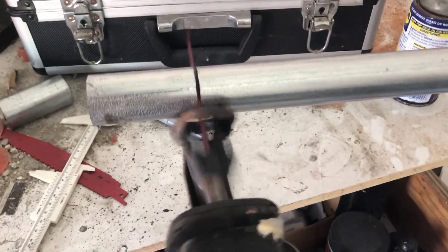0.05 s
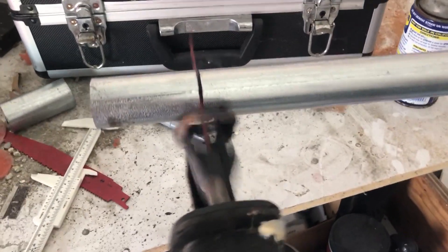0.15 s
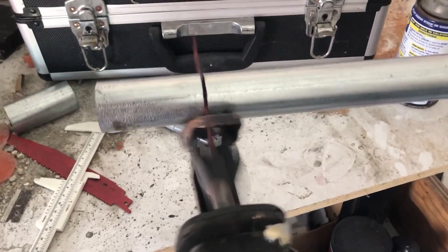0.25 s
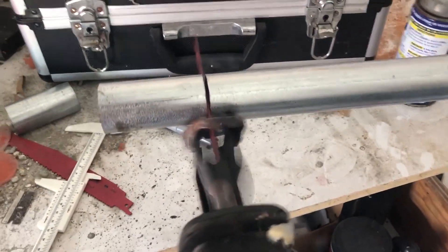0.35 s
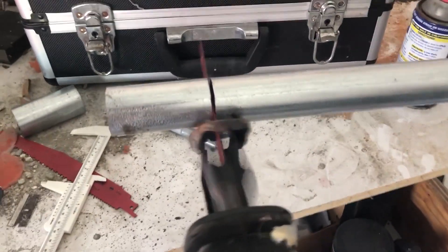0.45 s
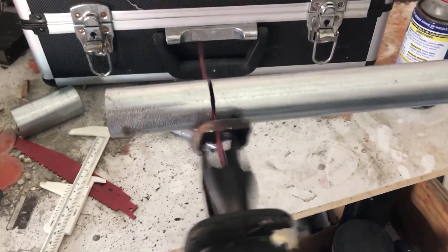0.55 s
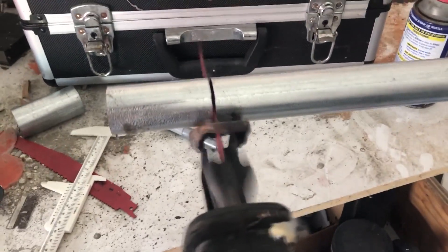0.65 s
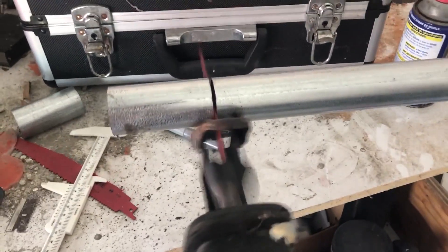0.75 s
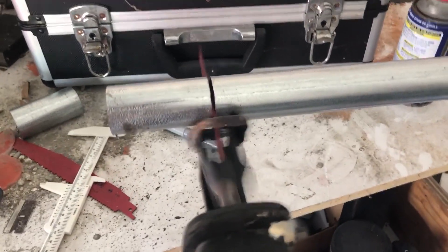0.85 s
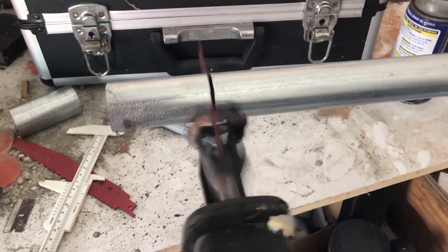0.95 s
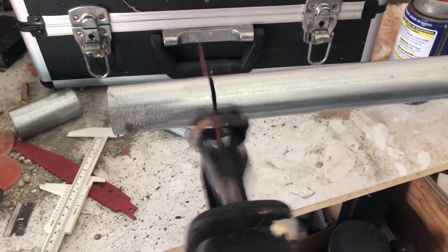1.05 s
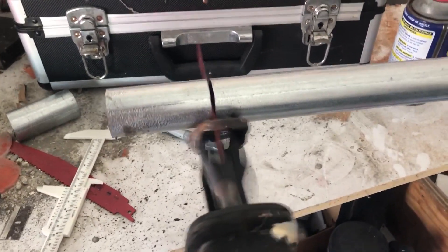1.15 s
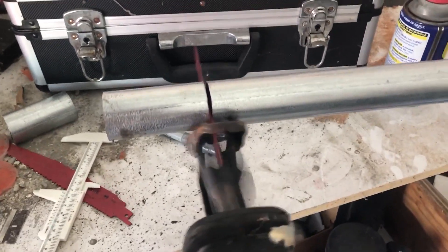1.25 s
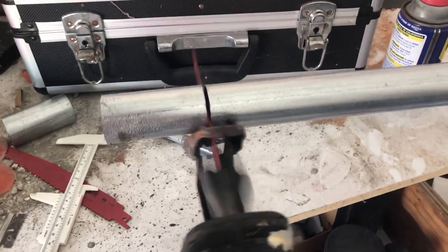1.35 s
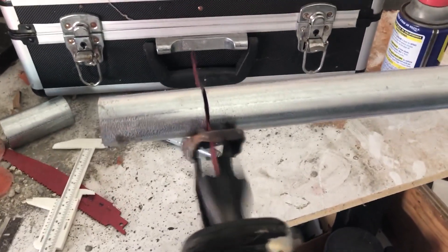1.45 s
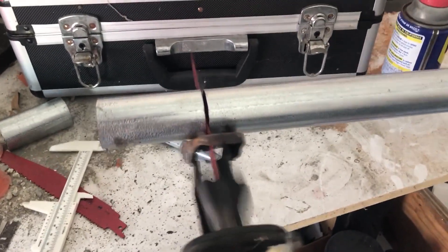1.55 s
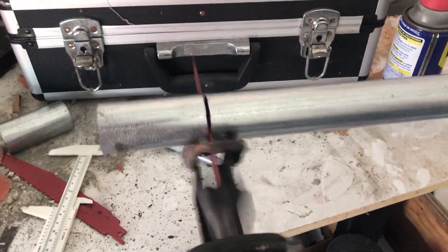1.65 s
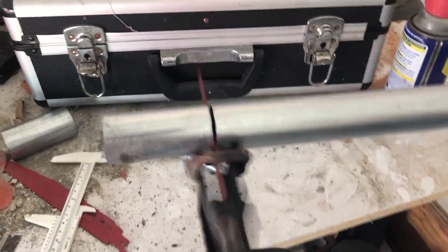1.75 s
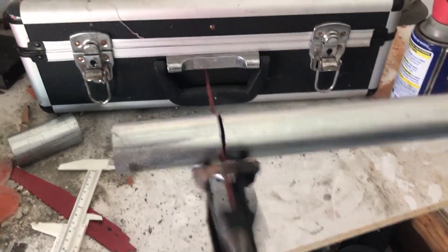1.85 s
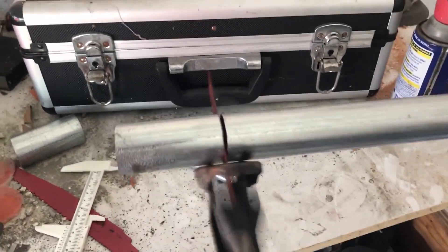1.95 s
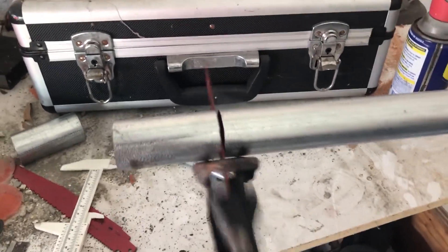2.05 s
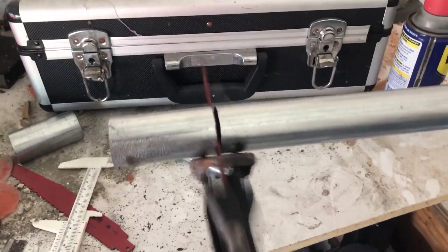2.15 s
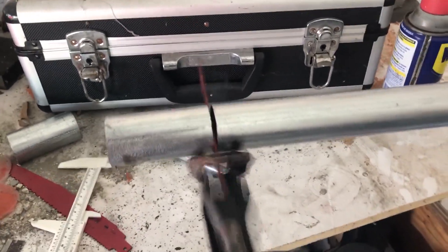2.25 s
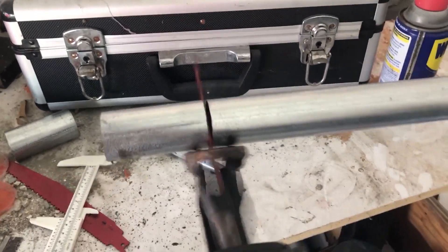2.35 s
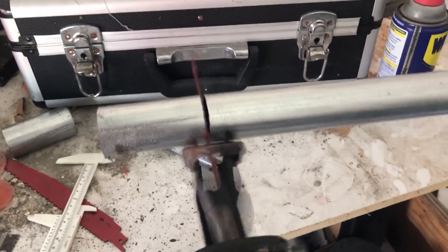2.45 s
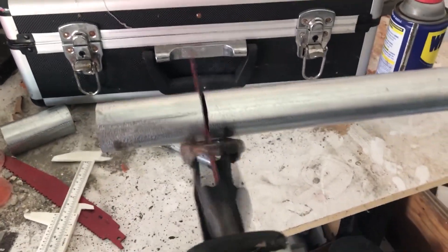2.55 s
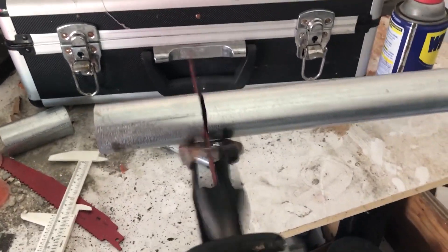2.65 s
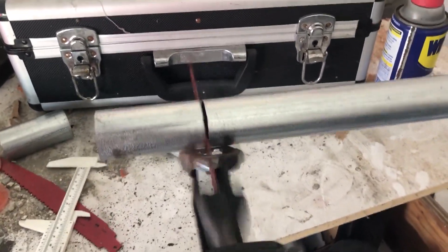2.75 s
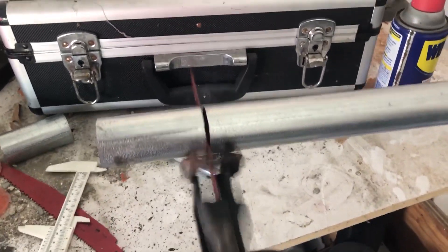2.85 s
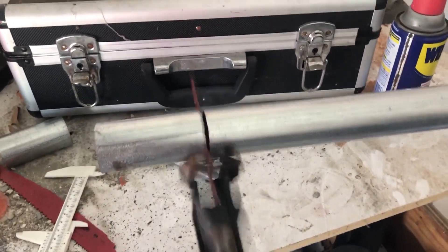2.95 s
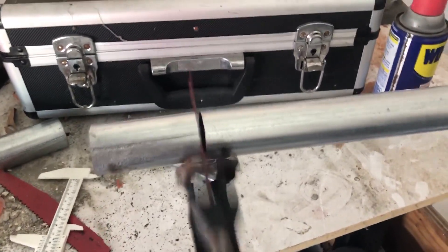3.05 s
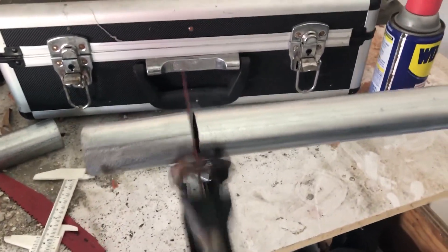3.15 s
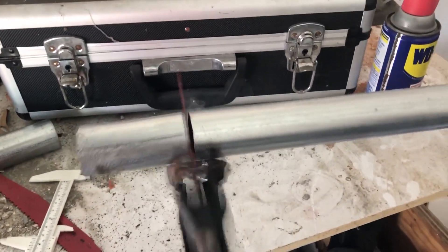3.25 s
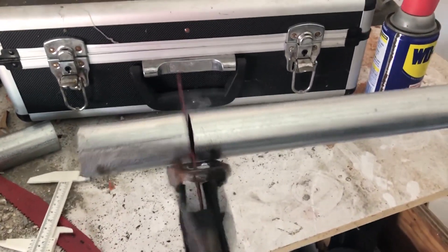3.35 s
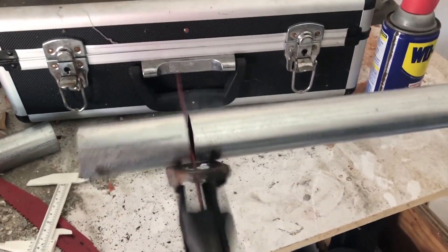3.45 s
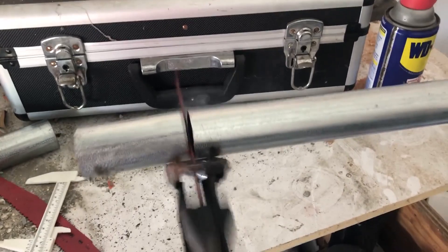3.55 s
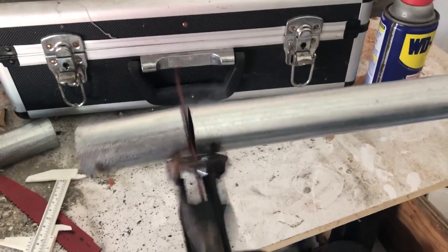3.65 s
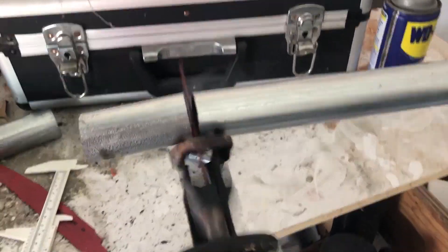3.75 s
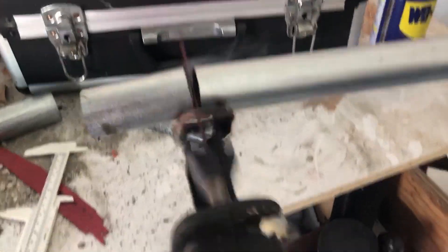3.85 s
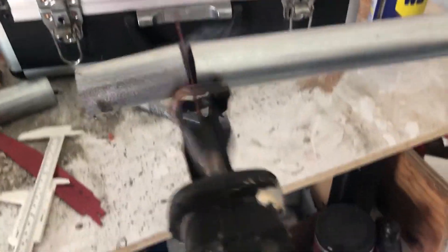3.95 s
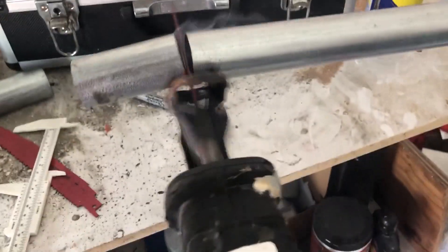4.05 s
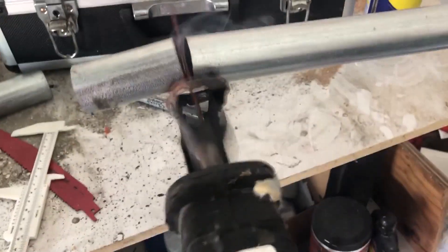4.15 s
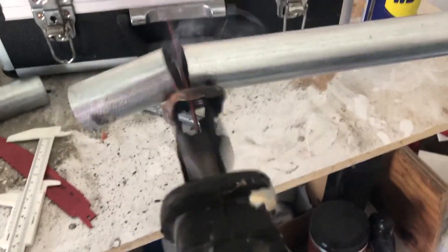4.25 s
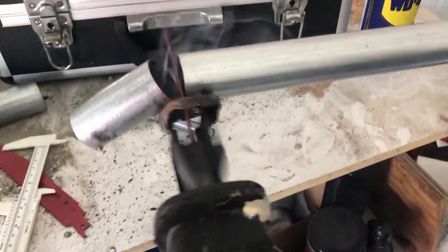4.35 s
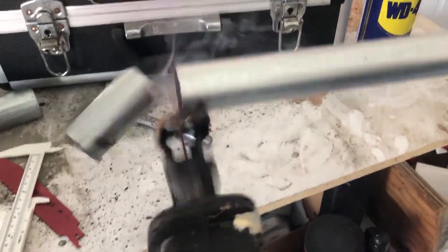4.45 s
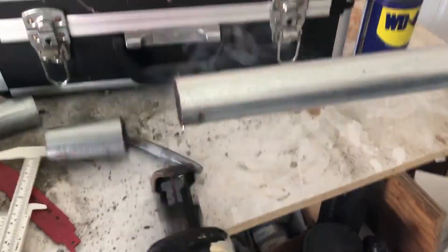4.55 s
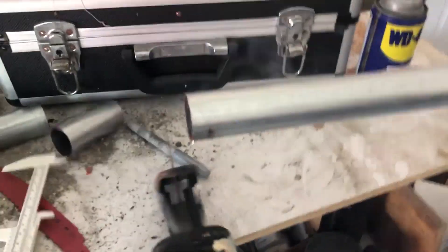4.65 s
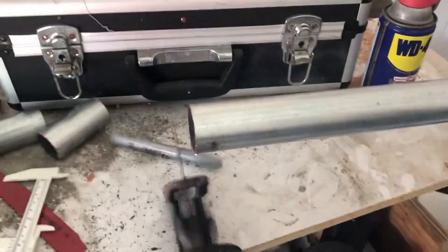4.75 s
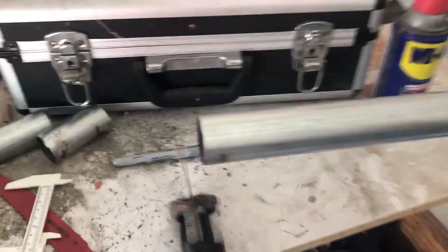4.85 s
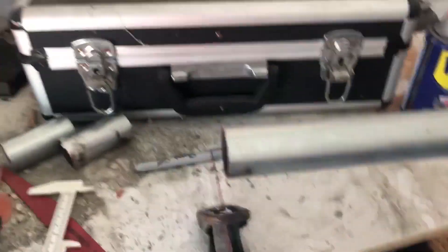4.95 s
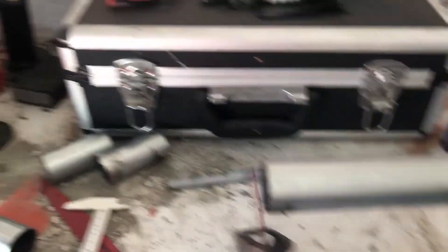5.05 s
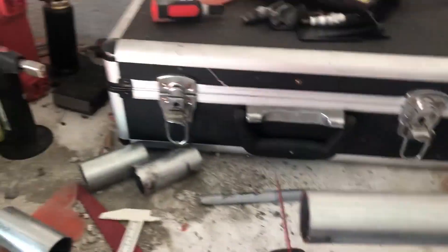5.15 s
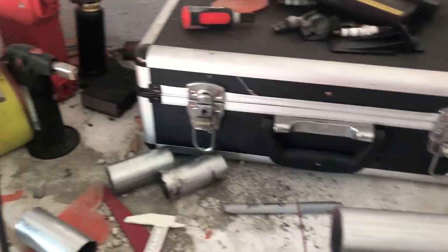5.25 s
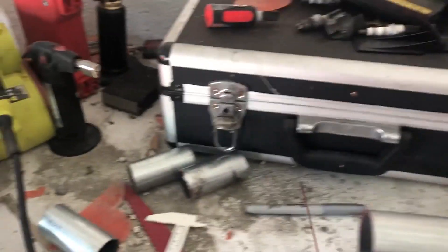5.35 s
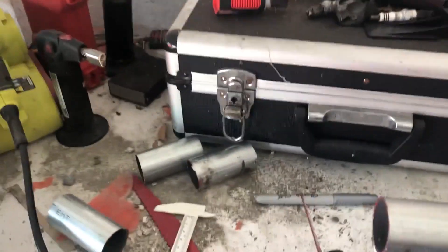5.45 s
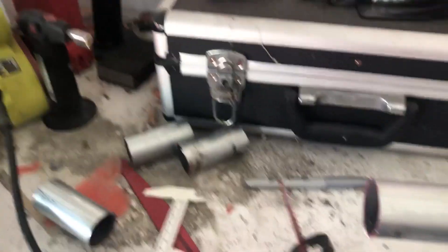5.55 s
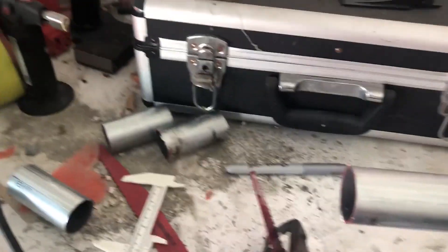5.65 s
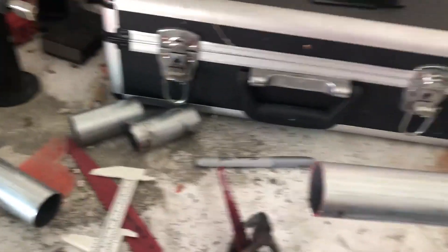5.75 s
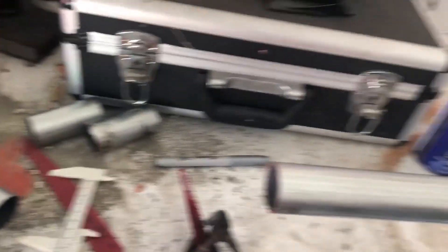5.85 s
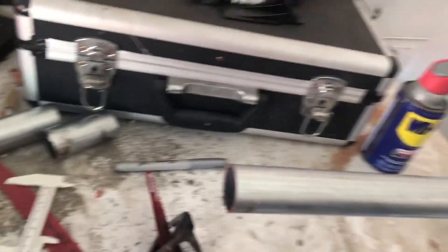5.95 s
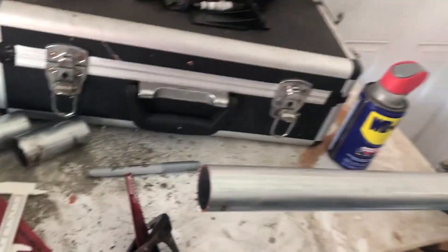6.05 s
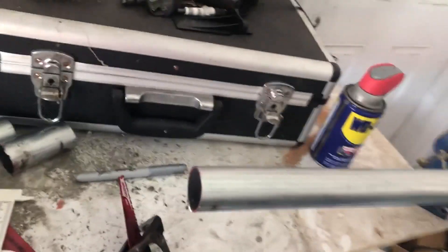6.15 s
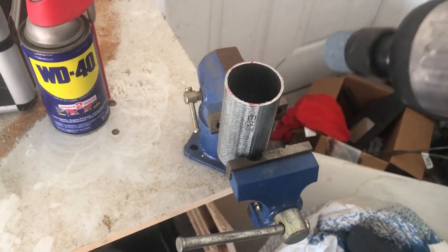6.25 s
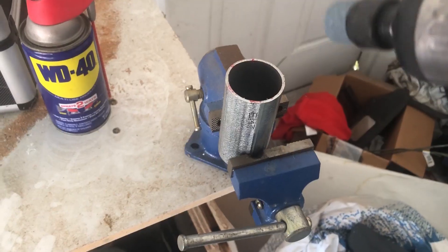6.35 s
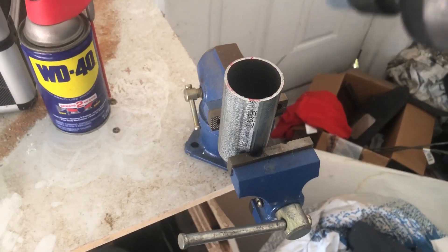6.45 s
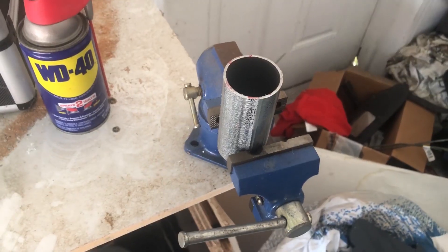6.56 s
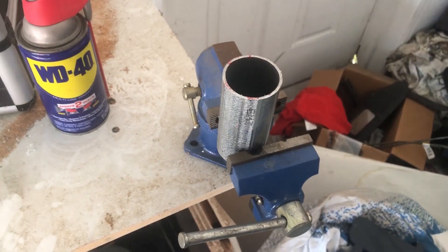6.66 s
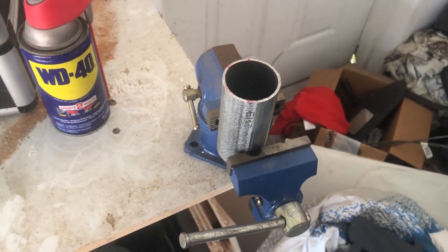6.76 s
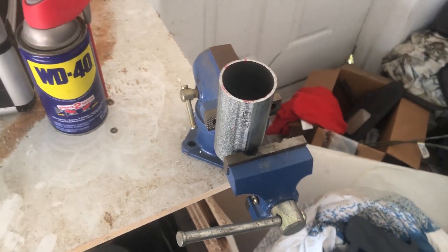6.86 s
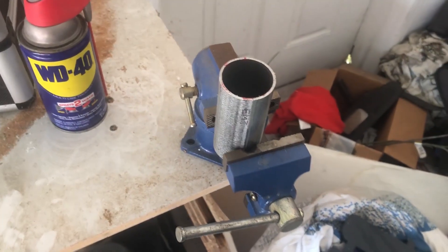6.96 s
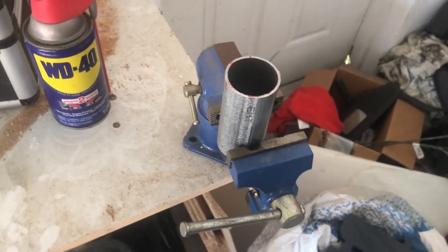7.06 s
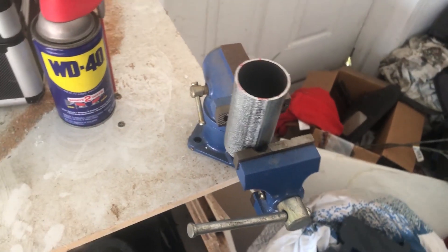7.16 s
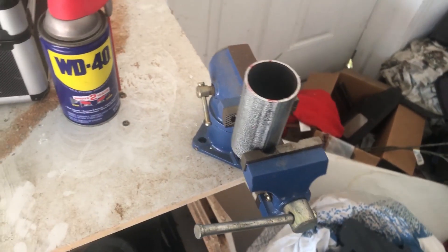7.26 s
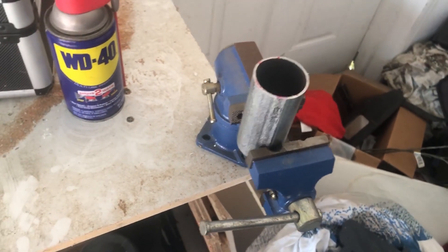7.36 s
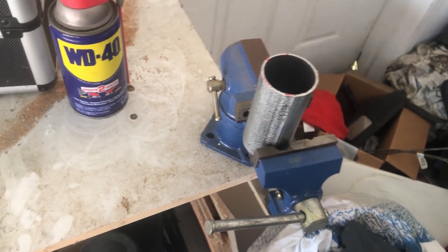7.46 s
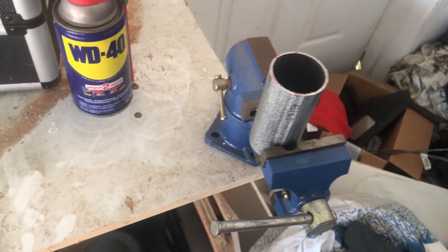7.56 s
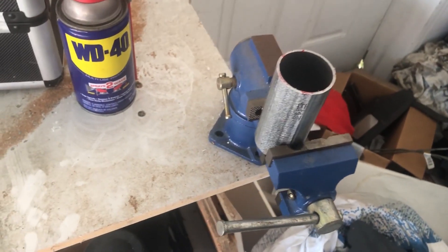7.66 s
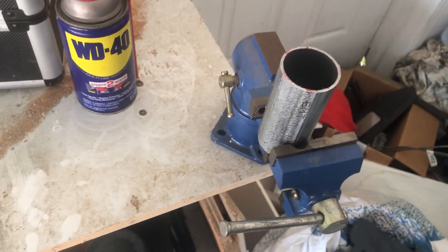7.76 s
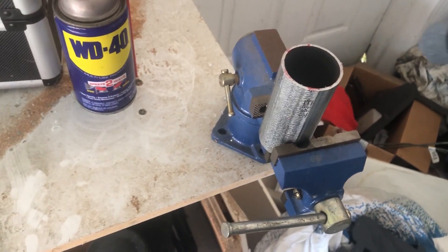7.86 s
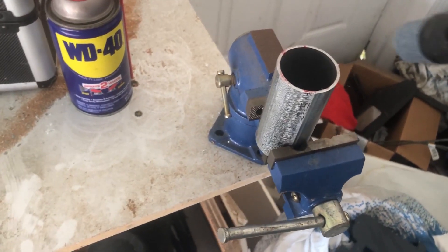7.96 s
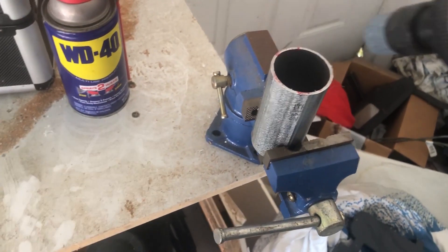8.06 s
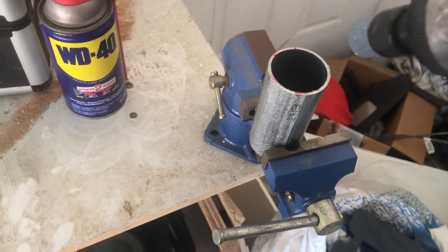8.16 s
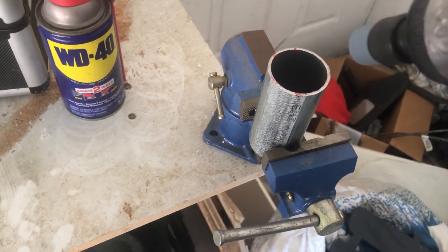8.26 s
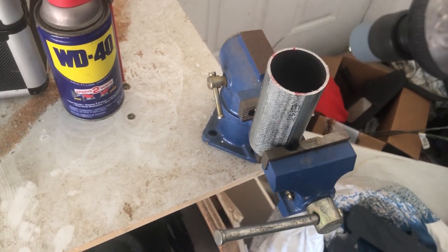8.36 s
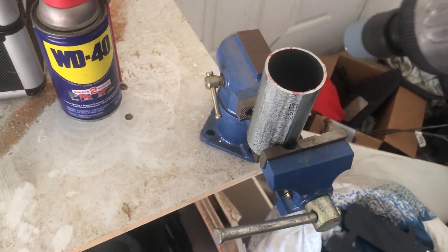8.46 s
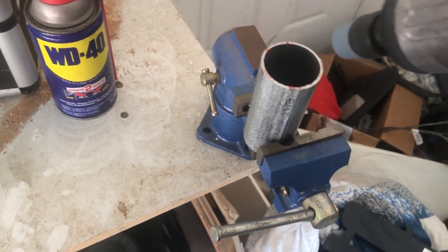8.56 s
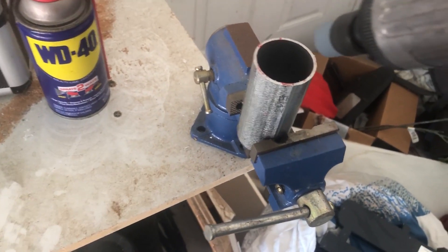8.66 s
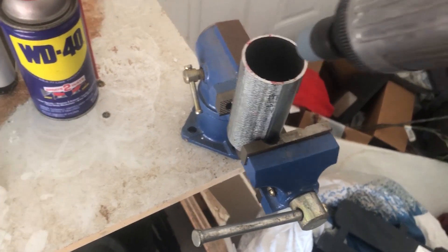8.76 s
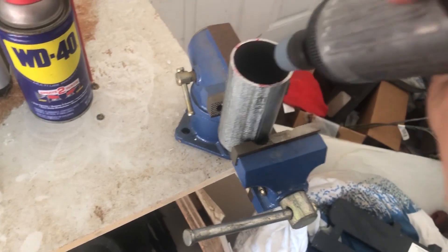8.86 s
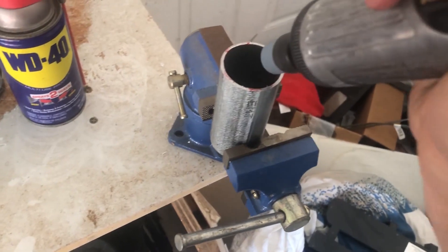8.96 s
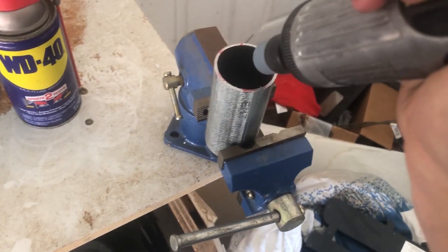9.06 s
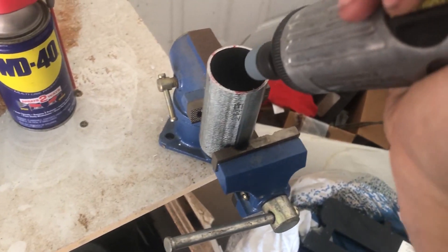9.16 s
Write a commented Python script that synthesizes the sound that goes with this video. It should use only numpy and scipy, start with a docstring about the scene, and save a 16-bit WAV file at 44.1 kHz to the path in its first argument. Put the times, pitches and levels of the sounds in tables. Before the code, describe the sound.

From the start to about 4.6 s a reciprocating saw cuts steel pipe at close range: a dense, harsh rasp pulsing about forty times a second, bench boom, flickering metallic squeals and a very high, thin motor whine. The pipe ring recedes around 2.4 s and returns stronger by 3.6 s. At 4.6 s the blade breaks through and briefly runs free; from 4.67 s the offcut clatters, thuds and rings in small bounces. Switched off at 4.8 s, the saw drops in pitch, its knocks separating until it stops near 5.7 s. Low workshop hum remains, cuts out for an instant around 6.3 s, and returns duller. Tiny dry ticks come at 7.1 s, a barely audible falling squeak at 7.8-8.1 s. At 8.3 s air hisses, a few puffs pop, and from 8.4 s an air grinder spins up quickly into a buzzing, hissing tone, sagging slightly in pitch near 8.8 s and continuing to the end.

```python
"""Reciprocating saw through steel pipe, then an air grinder.

Saw: stroke-locked noise (rasp) drives bench and pipe resonances; motor whine is a wavering sine.
The offcut drops as noise bursts and decaying sines; the saw coasts to rest.
A low filtered-noise hum runs throughout but for one brief silence. A trigger ticks and squeaks faintly;
a four-vane grinder hisses (filtered noise), puffs (falling sines) and spins up (rotor harmonics).
"""
import sys
import numpy as np
from scipy import signal
from scipy.fft import rfft, irfft, next_fast_len
from scipy.io import wavfile
from scipy.ndimage import uniform_filter1d

SR = 44100
rng = np.random.default_rng(int(sys.argv[2]) if len(sys.argv) > 2 else 0)


def transcribe(u):
    """Save the signal u as a 16-bit wav file named by the first command-line argument.

    u: samples, shape (n,) or (channels, n), limited to [-1, 1]; the rate is SR.
    q: integer samples, one column per channel.
    """
    v = np.clip(np.atleast_2d(u).T, -1, 1)
    q = np.round(v * 32767).astype(np.int16)
    wavfile.write(sys.argv[1], SR, q)


N = 405719
T = np.arange(N) / SR

# the cut over time: [t/s, commutator whine f/Hz, whine relative level/dB, rasp relative level/dB,
# pipe ring against rasp, relative level/dB]
CUT = [(0, 14210, -29, -14, -9), (.2, 14430, -28, -13.5, -9), (.4, 14210, -28, -13.5, -9),
       (1.2, 14210, -26, -14.5, -10), (1.9, 14350, -30, -15, -13), (2.4, 14450, -35, -15, -20),
       (2.8, 14320, -36, -15.5, -10), (3.6, 14080, -33, -15, -7.5), (4.25, 14220, -27, -13.5, -13),
       (4.58, 14250, -29, -17, -22)]
SWITCH_OFF_S = 4.82
# first vane puffs: [t/s, level/dB]
PUFFS = [(8.364, -12), (8.395, -9), (8.408, -2), (8.418, -10)]
VANES, CRUISE_HZ = 4, 422  # CRUISE_HZ: vane rate at which the exhaust levels hold
VALVE_OPENS_S, START_S = 8.27, 8.394


def undb(db):
    """dB to gain."""
    return 10 ** (np.asarray(db) / 20)


def unit(x):
    """Scale to rms 1."""
    return x / np.sqrt(np.mean(x ** 2))


def curves(table):
    """Columns of a table, interpolated to one value a sample."""
    s, *columns = np.transpose(table)
    return [np.interp(T, s, c) for c in columns]


def colour(x, points):
    """Filter x by (Hz, dB) points joined over log frequency; rms 1."""
    hz, db = np.transpose(points)
    size = next_fast_len(N)
    f = np.maximum(np.fft.rfftfreq(size, 1 / SR), 1)
    gain = undb(np.interp(np.log(f), np.log(hz), db))
    return unit(irfft(rfft(x, size) * gain, size)[:N])


def ring(x, modes):
    """Sum of (Hz, width Hz, dB) resonances of alternating sign."""
    out = 0
    for k, (hz, width_hz, db) in enumerate(modes):
        b, a = signal.iirpeak(hz, hz / width_hz, SR)
        out = out + (-1) ** k * undb(db) * signal.lfilter(b, a, x)
    return out


def walk(rate_hz):
    """Random levels joined by ramps, rate_hz new levels a second; rms about 0.7."""
    k = int(SR / rate_hz)
    held = np.repeat(rng.standard_normal(N // k + 1), k)
    return 0.85 * uniform_filter1d(held, k)[:N]


def burst(s, db, decay_s):
    """Envelope that jumps at s and decays exponentially, cut after 0.15 s."""
    out, start = np.zeros(N), int(s * SR)
    age_s = np.arange(int(.15 * SR)) / SR
    out[start:start + len(age_s)] = undb(db) * np.exp(-age_s / decay_s)
    return out


def repeating(cycles, per_cycle, memory):
    """Noise of which each cycle partly repeats the last, as when the same teeth or vanes come round."""
    fresh = rng.standard_normal((260, per_cycle))
    worn = signal.lfilter([1], [1, -min(memory, .97)], fresh, axis=0).ravel()
    return unit(worn[(cycles * per_cycle).astype(int)])


def saw():
    """Teeth in the kerf drive pipe, bench and housing; the levels follow cut, free running and coasting."""
    whine_hz, free, speed_db = motor()
    _, whine_db, level_db, ring_db = curves(CUT)
    whine_db += 2.5
    boom_db = -18 - .55 * ring_db  # the bench booms more while the gripped pipe rings less
    free_boom_db, free_whine_db, free_level_db, free_ring_db = -16.5, -30.5, -18.5, -18
    boom_db += free * (free_boom_db - boom_db)
    whine_db += free * (free_whine_db - whine_db) + 1.1 * speed_db
    level_db += free * (free_level_db - level_db) + 1.5 * speed_db
    ring_db += free * (free_ring_db - ring_db)

    whines_per_stroke = 365
    stroke_hz = whine_hz / whines_per_stroke
    strokes = np.cumsum(stroke_hz) / SR + .3
    pace = np.minimum(stroke_hz / stroke_hz[0], 1)
    boom_gate, treble_gate = knocks(strokes, stroke_hz)
    speed = np.abs(np.sin(2 * np.pi * (strokes - .12)))  # the teeth bite hardest in mid-stroke
    bite = (.4 + speed) * undb(0.9 * walk(60) + 1.5 * walk(12))
    chips = rng.standard_normal(N) * undb(3.0 * walk(900))

    low, high = pipe(bite)
    body = undb(-0.5 - 3.5 * free) * rasp(strokes, boom_gate, chips * bite, pace)
    body += free * undb(-6.5) * housing(strokes, stroke_hz)
    body += undb(boom_db) * bench(strokes, boom_gate, pace)
    body += undb(1.1 * ring_db - 1.5) * low
    body += undb(ring_db + 1.5 * speed_db + 3) * high
    body += undb(-9) * clank(chips, treble_gate)
    body += undb(-21) * shake(strokes)
    stop = np.clip((5.68 - T) / 0.034, 0, 1)
    return (undb(level_db) * body + whine(whine_hz, whine_db, pace)) * stop


def motor():
    """Whine pitch loaded, climbing when cut through, coasting down; blade freedom 0-1; speed loss in dB."""
    loaded_hz = curves(CUT)[0]
    free_whine_hz, rev_up_s = 15500, .12
    coast_s, friction_hz = .987, 10170  # drag time; dry friction as a whine offset
    through_s = CUT[-1][0]
    free = 1 - np.exp(-np.clip(T - through_s, 0, SWITCH_OFF_S - through_s) / rev_up_s)
    driven_hz = loaded_hz + free * (free_whine_hz - loaded_hz)
    drag = np.exp(-np.clip(T - SWITCH_OFF_S, 0, None) / coast_s)
    hz = np.maximum((driven_hz + friction_hz) * drag - friction_hz, 600)
    return hz, free, 20 * np.log10(hz / driven_hz)


def knocks(strokes, stroke_hz):
    """Decaying blows at fixed places in each stroke, as gains for boom and treble."""
    # [place in stroke/0-1, decay/s, boom relative level/dB, treble relative level/dB]
    blows = [(.05, .002, -5, -11), (.53, .003, 6, -6.5), (.9, .0015, -7, 0)]
    scatter = rng.standard_normal((260, len(blows)))
    boom_gate, treble_gate = .5, .3
    for k, (place, decay_s, boom_db, treble_db) in enumerate(blows):
        since_s = (strokes - place) % 1 / stroke_hz
        scatter_db = 2.2 * scatter[(strokes - place).astype(int), k]
        blow = np.exp(-since_s / decay_s) * undb(scatter_db)
        boom_gate = boom_gate + undb(boom_db) * blow
        treble_gate = treble_gate + undb(treble_db) * blow
    return boom_gate, treble_gate


def teeth(strokes, memory):
    """The same teeth meet the same kerf on every stroke."""
    return repeating(strokes, 1130, memory)


def rasp(strokes, boom_gate, torn, pace):
    """Repeating tooth noise plus torn chips; coasting, it dulls and the upper part fades."""
    # [f/Hz, relative density/dB]
    spectrum = [(29, -52), (50, -19), (193, -7), (658, -6), (967, 0.5), (1260, -3.5), (3000, -8.5),
                (3220, -8), (7490, -19), (9080, -12), (13300, -18.5), (14700, -14.5), (15800, -23)]
    out = colour(teeth(strokes, 0.66) * (0.72 + boom_gate) + torn, spectrum)
    dull = signal.sosfilt(signal.butter(2, 3600, fs=SR, output="sos"), out)
    return dull + np.sqrt(pace) * (out - dull)


def bench(strokes, boom_gate, pace):
    """Bench modes driven by the teeth; coasting, the knocks stand apart."""
    # [f/Hz, width/Hz, relative level/dB]
    modes = [(790, 50, 2), (950, 130, 2), (1090, 80, -5), (1650, 250, -10), (2160, 240, -5),
             (2420, 200, -12)]
    return unit(ring(teeth(strokes, .85) * (boom_gate - 0.36 * (1 - pace)), modes))


def pipe(bite):
    """Low and high pipe modes squeal in short spells when the teeth catch."""
    # both: [f/Hz, width/Hz, relative level/dB]
    low_modes = [(2770, 60, -3.5), (3205, 40, 8)]
    high_modes = [(4800, 90, -14), (6290, 55, -13), (8905, 60, -1.5)]
    low = unit(ring(rng.standard_normal(N) * bite ** 1.5 * undb(4.0 * walk(40)), low_modes))
    high = unit(ring(rng.standard_normal(N) * bite ** 1.5 * undb(1.5 * walk(40)), high_modes))
    return low, high


def clank(chips, treble_gate):
    """Broad treble resonances struck by the knocks."""
    modes = [(5000, 3000, -2), (10700, 2200, 3.5), (15500, 900, -3.5)]
    return unit(ring(chips * treble_gate * undb(2.0 * walk(10)), modes))


def shake(strokes):
    """Body shake: harmonics of the stroke rate, each wavering in level."""
    # relative level/dB of stroke-rate multiples 1, 2, 3 ..
    harmonics_db = [-30.5, -25.5, -1.5, -10.5, 0.5, -11.5, -7, -3.5, -8.5]
    return sum(undb(db + 1.5 * walk(6)) * np.cos(2 * np.pi * k * strokes + k * k)
               for k, db in enumerate(harmonics_db, 1))


def housing(strokes, stroke_hz):
    """Unloaded, the crank knocks at both stroke ends and rings the housing."""
    # [f/Hz, width/Hz, relative level/dB]
    modes = [(560, 120, -5), (830, 110, 1), (1660, 140, -2), (2400, 220, -2)]
    place, decay_s, return_db = .03, .005, -3
    crank = sum(undb(db) * np.exp(-((strokes - p) % 1) / stroke_hz / decay_s)
                for p, db in [(place, 0), (place + .5, return_db)])
    return unit(ring(rng.standard_normal(N) * (crank + .15), modes))


def whine(whine_hz, whine_db, pace):
    """Uneven brush contact makes the commutator sine waver in pitch and flicker."""
    phase = np.cumsum(whine_hz + 40 * walk(150)) / SR
    fade = np.sqrt(pace) / (1 + (5600 / whine_hz) ** 6)  # vanishes below about 5600 Hz
    return np.sin(2 * np.pi * phase) * fade * undb(whine_db + 3.0 * walk(90))


def grinder():
    """Exhaust tone and first puffs, plus air throbbing with the rotor."""
    since_s, sagged, vane_hz = rotor()
    on = T >= VALVE_OPENS_S
    turn_hz = vane_hz / VANES
    turns = np.cumsum(turn_hz * on * (1 + .001 * walk(80))) / SR
    running = np.clip(vane_hz / CRUISE_HZ - .4, 0, .6) / .6  # 0 at the start, 1 at full speed
    throb = 1 + running * (0.28 * np.cos(2 * np.pi * turns) + 0.073 * np.cos(2 * np.pi * VANES * turns))
    air = leak(since_s) + running ** 2 * jet(turns, sagged)
    return exhaust(turn_hz, turns, running, on) + puffs() + air * throb * on


def rotor():
    """Time since start, sag 0-1, vane rate: exponential spin-up, slow droop from the start, one pressure sag."""
    top_hz, spin_up_s, droop_hz_per_s = 476, .057, 29
    sag_s, sag_width_s, sag_hz = 8.795, .037, 33.3
    since_s = np.clip(T - START_S, 0, None)
    sagged = (1 + np.tanh((T - sag_s) / sag_width_s / 2)) / 2
    driven_hz = top_hz - sag_hz * sagged - droop_hz_per_s * since_s
    return since_s, sagged, driven_hz * (1 - np.exp(-since_s / spin_up_s))


def muffler_gain(hz):
    """Gain of the exhaust chamber; an echo off the bench thins it near the cruising note."""
    # [f/Hz, width/Hz, relative level/dB]
    modes = [(980, 140, -2), (1470, 300, -8), (2334, 67, -4), (3530, 110, 8)]
    dip = 1 - .45 / (1 + ((hz - 421) / 22) ** 2)
    passed = sum(undb(db) / np.sqrt(1 + (2 * (hz - f) / width_hz) ** 2) for f, width_hz, db in modes)
    return dip * (0.17 + passed)


def exhaust(turn_hz, turns, running, on):
    """Uneven vanes give a line at every multiple of the rotor turn, shaped by the muffler."""
    # relative level/dB of rotor-turn multiples 1, 2, 3 .. at cruising speed
    lines_db = [-43, -39, -33, -9, -38, -26, -25, -13, -19, -18, -17, -7, -11, -11, -12, -7, -14, -17, -17,
                -14, -15, -20, -24, -33, -20, -23, -27, -20, -19, -28, -31, -22, -14, -22, -35, -38]
    odd_slot_rad = 2.3  # one vane slot sits off centre: shifts the line just above each vane harmonic
    tone_on_s = 8.42
    swell_start_s, swell_end_s = 8.48, 8.6
    building = np.clip(1 - (T[on] - tone_on_s) / .19, 0, 1)
    lines, power = 0, 0
    for k, db in enumerate(lines_db, 1):
        gain = undb(db) * muffler_gain(k * turn_hz[on]) / muffler_gain(k * CRUISE_HZ / VANES)
        # the second vane harmonic leads; puffs sharpen as pressure builds
        gain = gain * undb(-1.3 * abs(k - 2 * VANES) * building)
        if k % VANES:
            gain = gain * running[on] ** 2  # the vanes differ more as they are flung outwards
        shift_rad = 0.0105 * k * k + odd_slot_rad * (k % VANES == 1)  # lows leave the chamber late
        flicker = undb(1.6 * min(k / 8, 1) * walk(40)[on])
        lines = lines + gain * flicker * np.cos(2 * np.pi * k * turns[on] + shift_rad)
        power = power + gain ** 2 / 2
    tone = np.zeros(N)
    tone[on] = lines / np.sqrt(power)
    tone_db = np.interp(T, (swell_start_s, swell_end_s), (-18.5, -13))
    tone_db -= 3.5 * np.clip(T - swell_end_s, 0, None)  # droop, dB/s
    return tone * undb(tone_db) * np.clip((T - tone_on_s) / .01, 0, 1)


def puffs():
    """The first vane puffs come singly, decaying sines that drop in pitch."""
    out = np.zeros(N)
    for s, db in PUFFS:
        age_s = np.clip(T - s, 0, None)
        cycles = 150 * age_s + 2000 * 0.00171 * (1 - np.exp(-age_s / 0.0017))
        out += burst(s, db, .003) * np.sin(2 * np.pi * cycles)
    return out


def leak(since_s):
    """Escaping air: the valve opens and whistles, the first puff chokes it, the start lets it surge."""
    # [f/Hz, relative density/dB]
    hiss_spectrum = [(180, -60), (300, -14), (2390, -2), (4190, -15), (5560, -15), (8410, -13),
                     (15800, -18)]
    # [f/Hz, width/Hz, relative level/dB]
    valve_modes = [(2340, 220, -18), (5400, 300, 4)]
    opened_s = T - VALVE_OPENS_S - .027
    opening_db = -31.5 + np.minimum(1100 * opened_s, 90 * opened_s)  # slopes in dB/s
    choked_db, surge_db, fade_db_per_s, left_db = -32, -21, 28, -33.5
    surging_db = np.maximum(surge_db - fade_db_per_s * since_s, left_db)
    choked = T > PUFFS[0][0]
    leak_db = np.where(choked, np.where(since_s > 0, surging_db, choked_db), opening_db)
    noise = rng.standard_normal((2, N))
    whistle = undb(np.where(choked, -9, 0)) * unit(ring(noise[1], valve_modes))
    return undb(uniform_filter1d(leak_db, size=300)) * (colour(noise[0], hiss_spectrum) + whistle)


def jet(turns, sagged):
    """Air noise partly repeating every turn, in resonances that shift in level with the pressure sag."""
    # [f/Hz, width/Hz, relative level at full pressure/dB, relative level after the sag/dB]
    modes = [(4450, 1200, -11.5, -11.5), (6370, 120, -8, 2), (7470, 160, -5, -12), (9330, 100, 1.5, 1.5),
             (11000, 2100, -8, -8), (14700, 600, -6, -6)]
    vanes = repeating(turns, 416, .75)
    full = unit(ring(vanes, [(hz, width_hz, full_db) for hz, width_hz, full_db, _ in modes]))
    sunk = unit(ring(vanes, [(hz, width_hz, sunk_db) for hz, width_hz, _, sunk_db in modes]))
    return undb(-33.5) * (full + sagged * (sunk - full))


def offcut():
    """Each bump is a short scrape in the steel and a thud in the bench; in flight the piece rings clean."""
    # falls, rolls, and the blade rattling loose: [t/s, scrape drive level/dB, thud against it, level/dB]
    bumps = [(4.6713, -4, -10), (4.6915, -5, -4.5), (4.7425, -5, -12), (4.7816, -10.5, -9),
             (4.8274, -7, -11), (4.8794, -17, 0), (4.957, -8.5, -17), (5.0205, -7, -17), (5.1696, -28.5, 3),
             (5.2815, -30, 2), (5.3847, -40, 2), (5.5427, -44, -1)]
    # three thud modes, then scrape modes: [f/Hz, width/Hz, relative level/dB]
    modes = [(330, 250, 5.5), (1200, 660, -1), (1650, 220, 7.5), (9400, 1500, 4.5), (11600, 900, 1)]
    # airborne between bounces: [t struck/s, t landed/s, relative level/dB]
    flights = [(4.705, 4.75, -28), (4.778, 4.834, -30), (4.92, 4.995, -26), (5.03, 5.091, -34.5)]
    # [f/Hz, relative level/dB, t60/s]
    clean_modes = [(3175, 2.5, 1.3), (3440, -12, .1), (8700, -10.5, .5), (12160, -15.5, .5)]
    scrape = sum(burst(s, db, 0.0064) for s, db, _ in bumps)
    thud = sum(burst(s, db + rel_db, .009) for s, db, rel_db in bumps)
    noise = rng.standard_normal((2, N))
    out = undb(-7) * ring(noise[0] * scrape, modes[3:] + [(3000, 3500, -8.5)])
    out += undb(11.5) * ring(noise[1] * thud, modes[:3] + [(70, 60, 1)])
    for struck_s, landed_s, db in flights:
        airborne = np.clip((landed_s - T) / .004, 0, 1)
        for hz, mode_db, t60_s in clean_modes:
            decay = burst(struck_s, db + mode_db, t60_s / np.log(1000))
            out += airborne * decay * np.sin(2 * np.pi * hz * T)
    return out


def trigger():
    """Small dry ticks (resonant noise bursts), then a faint falling squeak (wavering sine)."""
    # [t/s, relative level/dB, ring f/Hz]
    tick_table = [(7.0867, -38, 2460), (7.0912, -44, 2470), (7.1322, -49, 3260), (7.1354, -52, 6000),
                  (7.1484, -50, 7720)]
    # [t/s, f/Hz, level/dB]
    squeak = [(7.8, 3950, -88), (7.86, 3860, -77), (8.0, 3650, -73), (8.12, 3450, -89)]
    noise = rng.standard_normal(N)
    ticks = sum(ring(noise * burst(s, db + 4.5, .0015), [(hz, 0.49 * hz, 0), (9000, 4000, -6)])
                for s, db, hz in tick_table)
    hz, db = curves(squeak)
    sounding = (T > squeak[0][0]) & (T < squeak[-1][0])
    phase = np.cumsum(hz + 30 * walk(100)) / SR
    return ticks + sounding * undb(db + 3.0 * walk(40)) * np.sin(2 * np.pi * phase)


def workshop():
    """Wavering low hum of coloured noise that falls silent for a moment and comes back duller."""
    # before and after the silence: [f/Hz, relative density/dB]
    hum_before = [(15, -60.5), (25, -25), (53, -10), (123, -4.5), (361, -19.5), (437, -21.5), (1010, -24),
                  (1820, -35), (15800, -47.5)]
    hum_after = [(15, -50), (25, -23), (59, -2.5), (144, -10.5), (205, -6), (307, -14), (392, -17.5),
                 (1010, -29), (9210, -41), (15800, -45)]
    silence_start_s, silence_end_s, hum_db = 6.258, 6.318, -53.5
    first = colour(rng.standard_normal(N), hum_before) * (T < silence_start_s)
    second = colour(rng.standard_normal(N), hum_after) * (T > silence_end_s)
    return undb(hum_db) * (first + second) * undb(1.0 * walk(5))


def scene():
    """All sources at one close microphone, the same on both channels."""
    return np.tile(saw() + grinder() + offcut() + trigger() + workshop(), (2, 1))


def record(dry):
    """Peaks rounded by tanh, then a steep low-pass."""
    top_hz = 15750
    rounded = np.tanh(1.3 * dry) / 1.3
    return signal.sosfilt(signal.ellip(12, .2, 80, top_hz, fs=SR, output="sos"), rounded)


dry = scene()
out = record(dry)
transcribe(out)
```